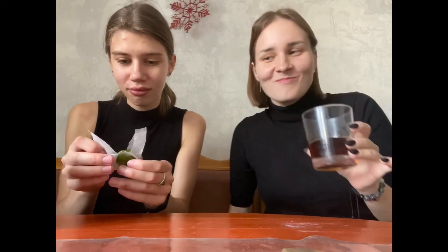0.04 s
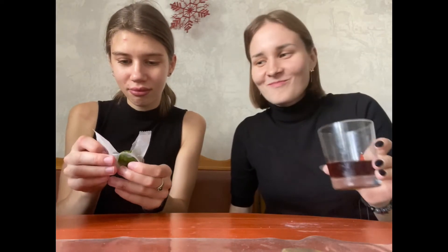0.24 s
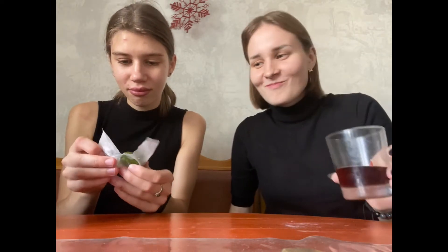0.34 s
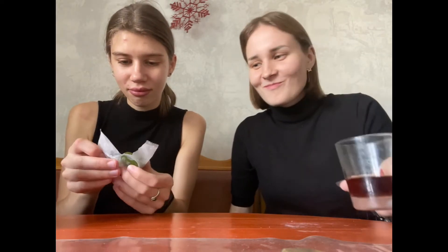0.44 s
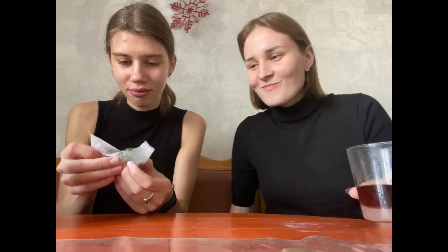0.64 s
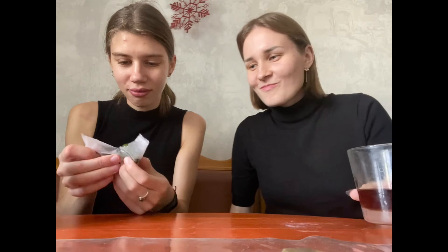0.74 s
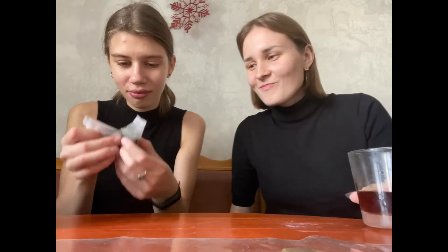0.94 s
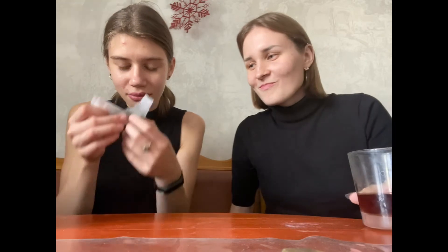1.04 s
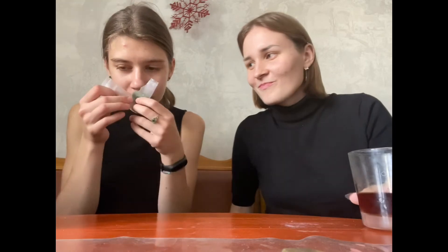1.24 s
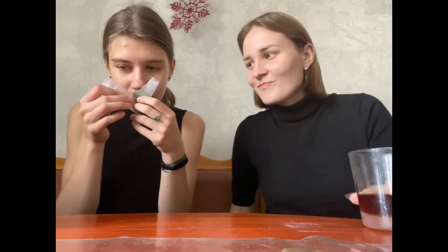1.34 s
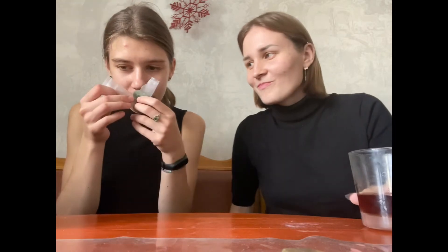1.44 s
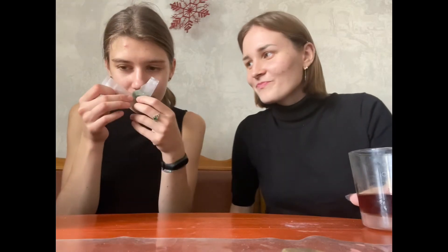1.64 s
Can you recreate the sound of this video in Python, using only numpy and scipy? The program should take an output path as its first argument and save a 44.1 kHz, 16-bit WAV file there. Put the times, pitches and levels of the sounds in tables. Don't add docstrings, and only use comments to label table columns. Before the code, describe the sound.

Crisp wrapper crinkling with faint finger rustle peaks early and thins to single ticks, then a glass thuds onto the table top and a few small crackles follow, close in a small, quietly humming room.

```python
import sys
import numpy as np
from scipy import signal
from scipy.fft import rfft, irfft
from scipy.io import wavfile

SR = 44100
rng = np.random.default_rng(int(sys.argv[2]) if len(sys.argv) > 2 else 0)


def transcribe(signal):
    frames = np.atleast_2d(signal).T
    limited = np.clip(frames, -1, 1)
    pcm = np.round(limited * 32767).astype(np.int16)
    wavfile.write(sys.argv[1], SR, pcm)


def to_linear_factor(level_db):
    exponent = np.asarray(level_db, float) / 20
    return 10 ** exponent


N = 74970


def band(x, hz, width):
    return signal.lfilter(*signal.iirpeak(min(hz, .45 * SR), hz / width, fs=SR), x)


def unit(x):
    return x / np.sqrt(np.mean(x ** 2))


def decay(t60, size):
    return np.exp(-np.log(1000) * np.arange(size) / SR / t60)


def ring(hz, t60, size=2048):
    return np.sin(2 * np.pi * hz * np.arange(size) / SR) * decay(t60, size)


def add(out, start_s, x, peak_db):
    i = int(start_s * SR)
    x = x[:N - i]
    out[i:i + len(x)] += to_linear_factor(peak_db) * x / np.abs(x).max()


# pitch_hz, density_db (dB per Hz)
AIR_COLOUR = [(45, -1.5), (120, -7.5), (300, -10), (1200, -16.5), (1600, -24), (3000, -28.5), (12500, -35),
              (15200, -59)]
# pitch_hz, width_hz, level_db, change_db once the hum shifts
HUM_RESONANCES = [(194.4, 3.3, -74.5, 6), (226.6, 13.5, -61.5, -30), (292, 12.2, -72, 4),
                  (491, 8.9, -71.5, -3.5), (766, 17, -72, -0.5), (1151, 12, -73.5, -2), (9500, 90, -92, 4),
                  (8000, 100, -83, -7)]
AIR_DB = -60
HUM_SHIFT_S, HUM_GLIDE_S = 1.26, .05


def air():
    f = np.maximum(np.arange(N // 2 + 1) * SR / N, 1)
    hz, db = np.array(AIR_COLOUR).T
    gain = to_linear_factor(np.interp(np.log(f), np.log(hz), db)) * np.minimum(f / hz[0], 1) ** 4
    out = to_linear_factor(AIR_DB) * unit(irfft(rfft(rng.standard_normal(N)) * gain, N))
    shift = .5 + .5 * np.tanh((np.arange(N) / SR - HUM_SHIFT_S) / HUM_GLIDE_S)
    for hz, width, level_db, change_db in HUM_RESONANCES:
        hum = unit(band(rng.standard_normal(N), hz, width))
        out += to_linear_factor(level_db + change_db * shift) * hum
    return out


# pitch_hz, level_db, t60_s
ROOM_TAIL = [(278, -26.5, 0.97), (700, -10.5, 0.178), (1400, -22.5, 0.63), (2500, -25.5, 0.25),
             (4500, -24, 0.98), (6500, -21, 0.53), (10200, -20.5, 0.37), (15000, -41, 0.12)]
ROOM_RISE_S = .016
ECHO_S, ECHO_DB = .004, -15


def room(x):
    t = np.arange(SR) / SR
    build_up = 1 - np.exp(-(t / ROOM_RISE_S) ** 2)
    out = to_linear_factor(ECHO_DB) * np.roll(x, int(ECHO_S * SR))
    for hz, level_db, t60 in ROOM_TAIL:
        def steep(v):
            return band(band(v, hz, 0.59 * hz), hz, 0.74 * hz)

        shape = to_linear_factor(level_db - 60 * t / t60) * build_up / 10
        energy = signal.fftconvolve(steep(x) ** 2, shape ** 2)[:N]
        hiss = unit(steep(rng.standard_normal(N)))
        out += np.sqrt(np.maximum(energy, 0)) * hiss
    return out


# start_s, peak_db
GLASS_KNOCKS = [
    (0.059, -46),
    (0.985, -35),
    (.9905, -20.5),
    (1.0409, -32),
    (1.092, -49),
    (1.638, -47),
]
# pitch_hz, level_db, t60_s
TABLE_MODES = [(85, -17, .5), (152, -2.5, 0.52), (290.5, 13, 0.09), (420, 20, 0.06), (561, 6, 0.12),
               (800, -4, 0.047)]
PUSH_S = 0.0017


def glass():
    out = np.zeros(N)
    table = sum(to_linear_factor(level_db) * ring(hz, t60, size=16384) for hz, level_db, t60 in TABLE_MODES)
    push = np.hanning(int(PUSH_S * SR) + 3)
    for start_s, peak_db in GLASS_KNOCKS:
        add(out, start_s, np.convolve(push, table), peak_db)
    return out


# start_s, length_s, level_db, centre_hz
FINGER_RUSTLES = [(0, 0.017, -62, 4630), (0.017, 0.055, -61, 3700), (0.057, 0.064, -65, 2170),
                  (0.148, 0.012, -48, 1620), (0.531, 0.025, -45, 1620), (.4, 0.037, -64, 1480),
                  (0.126, 0.021, -59.5, 4930), (0.152, 0.014, -47.5, 4630), (0.237, 0.03, -44, 4650),
                  (0.27, 0.061, -36.5, 4500), (0.531, 0.019, -44, 4500), (0.689, 0.086, -56.5, 2500),
                  (0.838, 0.028, -66.5, 9000)]


def rustles():
    out = np.zeros(N)
    grain_db = 2.6 * np.minimum(rng.exponential(size=N), 6)
    grains = rng.standard_normal(N) * to_linear_factor(grain_db)
    t = np.arange(N) / SR
    for start_s, length_s, level_db, hz in FINGER_RUSTLES:
        swell = np.sin(np.pi * np.clip((t - start_s) / length_s, 0, 1)) ** .5
        width = 1.26 * hz
        out += to_linear_factor(level_db) * swell * unit(band(band(grains, hz, width), hz, width))
    return out


CHATTER_S, CHATTER_DB = .0028, -8.5


def chatter(chance):
    t = np.arange(len(chance)) / SR
    slips = np.clip(chance, -2, 2) ** 3 / 12
    release = t == 0
    return to_linear_factor(CHATTER_DB) * slips * np.exp(-t / CHATTER_S) + release


SIDE_DB = -8.5
EDGE_HZ, EDGE_WIDTH_HZ = 11500, 6500

# start_s, peak_db, pitch_hz, cycles to die
PANEL_POPS = [(.035, -39, 1420, 8.6), (.050, -44, 1310, 12), (.2255, -46, 1400, 18),
              (.2398, -31.5, 1580, 11.5), (0.2445, -30, 1730, 3.1), (0.2601, -32.5, 1700, 4),
              (.274, -28, 1410, 6), (0.2825, -24, 1403, 4.2), (.2847, -11, 5180, 29),
              (0.2874, -29, 1327, 6.5), (0.2948, -20, 1390, 10), (.3052, -20.5, 2160, 12),
              (.306, -19.5, 1400, 8.4), (0.315, -27, 2160, 9.7), (0.322, -30.5, 1340, 10.6),
              (.4215, -32, 4800, 38), (.4495, -32, 2740, 12.4), (0.4501, -28.5, 1400, 4.8),
              (.5438, -30, 1520, 2.4), (.5458, -32.5, 1425, 24), (.632, -41.5, 1370, 12),
              (0.6781, -31.5, 2330, 1.7), (.6792, -27.5, 800, 4.9), (.712, -33.5, 1170, 3.6),
              (0.9927, -20.5, 2650, 2.5), (1.168, -30.5, 2540, 2.4), (1.2482, -29.5, 2050, 3.4),
              (1.249, -48.5, 950, 7.8), (1.5235, -46.5, 10540, 37), (1.664, -43, 540, 7.7)]
ATTACK_CYCLES = 0.4


def panels():
    out = np.zeros(N)
    for start_s, peak_db, hz, cycles in PANEL_POPS:
        t60 = cycles / hz
        body = ring(hz, t60) + to_linear_factor(SIDE_DB) * ring(min(hz * 1.415, EDGE_HZ), t60)
        body *= 1 - np.exp(-np.arange(len(body)) / SR * hz / ATTACK_CYCLES)
        add(out, start_s, np.convolve(chatter(rng.standard_normal(600)), body), peak_db)
    return out


# start_s, peak_db, pitch_hz, edge_db (treble edge relative to the snap)
CREASE_SNAPS = [(.0497, -40.5, 4900, -27.5), (.055, -45.5, 4300, 4.5), (.152, -37, 5770, -21),
                (.1565, -40, 4960, -19), (0.2123, -40, 4270, -8), (0.2399, -25.5, 5530, 0.5),
                (0.2442, -45, 4500, 3), (0.2515, -38, 4500, 4), (0.2734, -25, 4700, -8),
                (0.2815, -11, 4520, -2.5), (0.286, -15, 5460, 1), (0.295, -16, 4700, -16),
                (.3049, -17, 4500, -13), (0.3163, -20, 4980, 1.5), (.322, -23, 4500, -18),
                (0.4066, -43, 4500, 3), (0.4216, -21, 5020, -12), (0.447, -40.5, 4700, 7),
                (0.4495, -21.5, 4870, -18), (.459, -31.5, 4740, -25), (0.5395, -60, 4900, -18),
                (.596, -40, 3620, -18), (.624, -25.5, 4970, 0), (0.6318, -28, 3020, -2.5),
                (.7115, -29, 3730, -23), (.800, -43, 3480, -13), (0.898, -48, 4500, -18),
                (0.9923, -18, 4940, 5), (1.1656, -31, 6250, -3), (1.2485, -31.5, 6100, -27)]
CREASE_T60_S, EDGE_T60_S = 0.0026, 0.0041
SIDE_RATIO = 1.43


def creases():
    out = np.zeros(N)
    for start_s, peak_db, hz, edge_db in CREASE_SNAPS:
        sides = ring(hz * SIDE_RATIO, CREASE_T60_S) - ring(hz / SIDE_RATIO, CREASE_T60_S)
        body = ring(hz, CREASE_T60_S) + to_linear_factor(SIDE_DB) * sides
        add(out, start_s, np.convolve(chatter(rng.standard_normal(600)), body), peak_db)
        burst = rng.standard_normal(600) * decay(EDGE_T60_S, 600)
        add(out, start_s, band(burst, EDGE_HZ, EDGE_WIDTH_HZ), peak_db + edge_db)
    return out


FILM_CUT_HZ = 290


def scene():
    film = creases() + panels() + rustles()
    film = signal.sosfilt(signal.butter(2, FILM_CUT_HZ, "high", fs=SR, output="sos"), film)
    near = film + glass()
    return (near + room(near) + air())[None]


def low_pass(x):
    return signal.sosfilt(signal.butter(12, 17020, fs=SR, output="sos"), x)


MIC_LOW_HZ, MIC_TOP_HZ = 71.4, 16100


def record(dry):
    x = signal.sosfilt(signal.butter(4, MIC_LOW_HZ, "high", fs=SR, output="sos"), dry)
    x = signal.sosfilt(signal.cheby2(8, 30, MIC_TOP_HZ, fs=SR, output="sos"), x)
    return low_pass(x)


dry = scene()
out = record(dry)
transcribe(out)
```